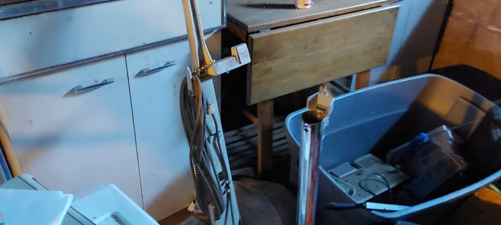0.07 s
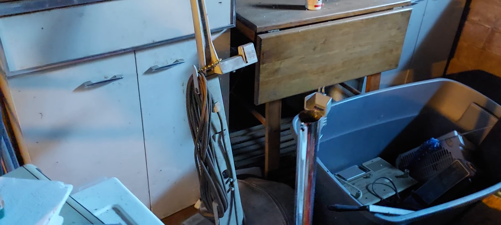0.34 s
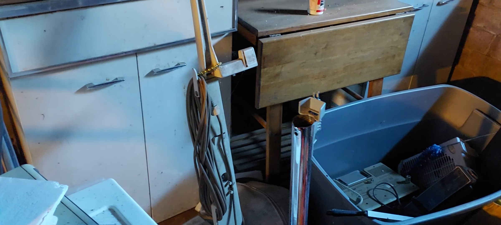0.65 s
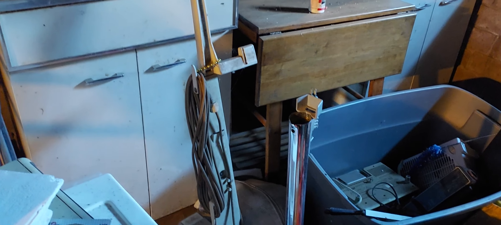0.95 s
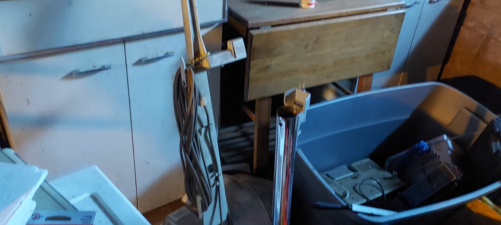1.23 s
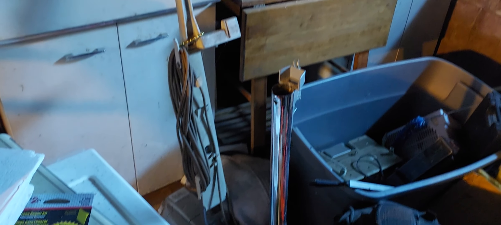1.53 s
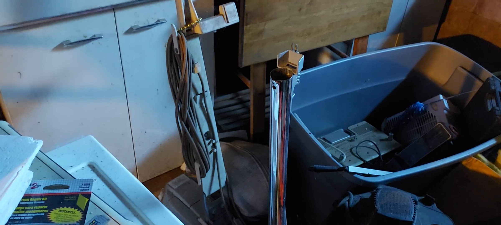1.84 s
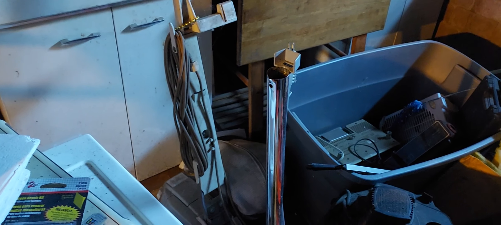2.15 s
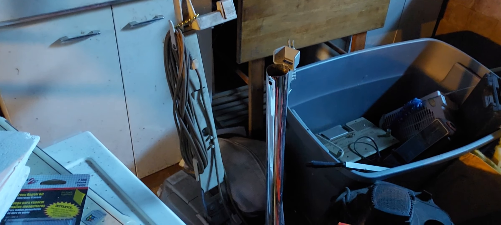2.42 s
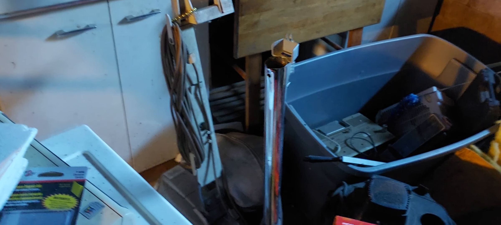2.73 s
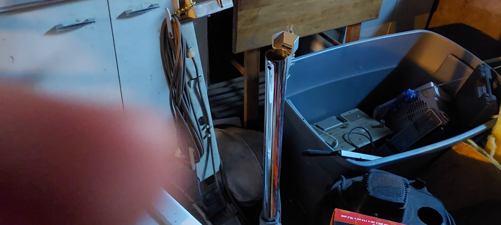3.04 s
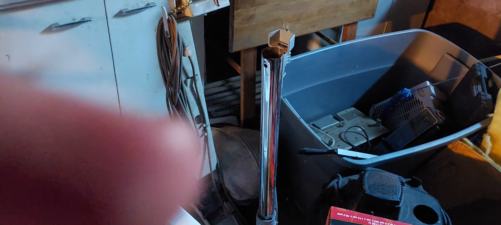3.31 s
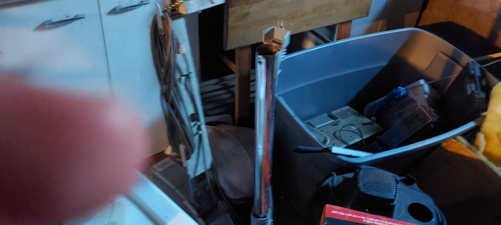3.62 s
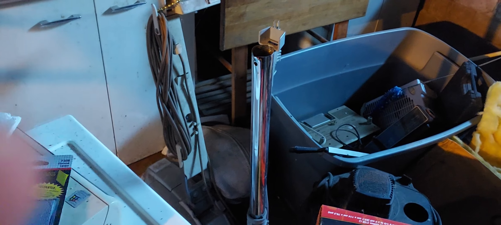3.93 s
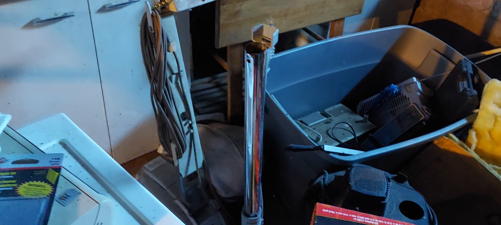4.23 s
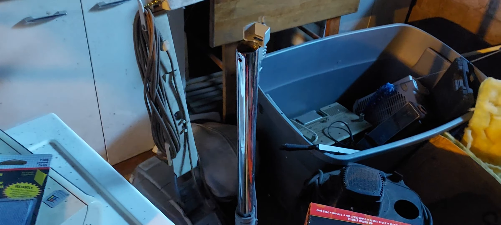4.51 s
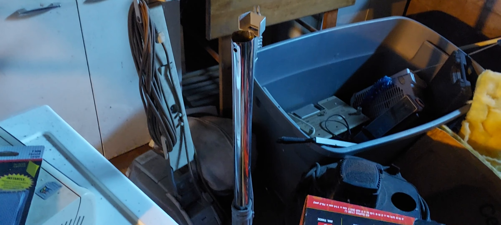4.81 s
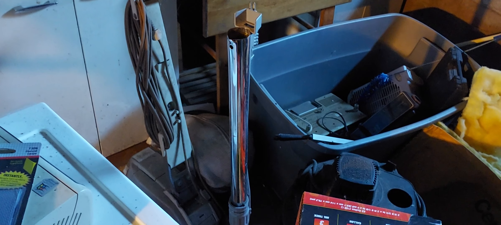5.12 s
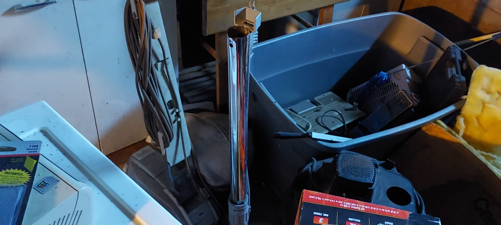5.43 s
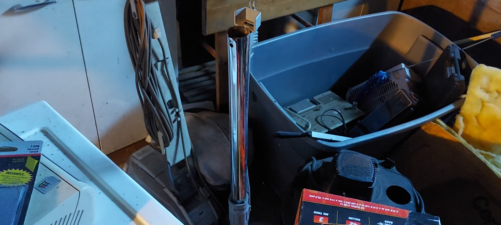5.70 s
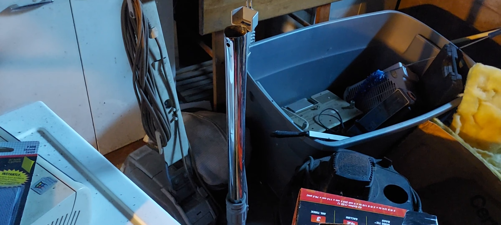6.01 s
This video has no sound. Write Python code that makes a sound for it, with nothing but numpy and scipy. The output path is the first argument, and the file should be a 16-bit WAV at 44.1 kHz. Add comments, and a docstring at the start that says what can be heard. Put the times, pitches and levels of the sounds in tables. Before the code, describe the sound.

A gas furnace runs steadily in a basement: a deep, boomy burner roar under a throbbing blower hum, with a soft rush of air and thin, faint fan whines. It is heard from a hand-held phone. Midway, a finger near the left microphone briefly adds a hollow colour and a faint high ring. Later the grip shifts with a few sharp little ticks and a short slide of skin.

```python
"""The steady low roar of a gas furnace in a basement, heard from a hand-held phone.
Burner noise booms through cabinet, duct and room resonances under a rush of air and thin fan whines;
the blower's shaft tones throb against the motor's mains hum. Close up, the hand brushes the case,
a finger hovers over the left microphone and colours the sound with a hollow ring,
and later the grip shifts with a few ticks and a short slide of skin."""
import sys
import numpy as np
from scipy import signal
from scipy.fft import rfft, irfft, next_fast_len
from scipy.io import wavfile

SR = 44100
rng = np.random.default_rng(int(sys.argv[2]) if len(sys.argv) > 2 else 0)


def bounce(signal):
    """Save signal as a 16-bit WAV file at the path given by the first command-line argument."""
    frames = np.transpose(np.atleast_2d(signal))
    limited = np.clip(frames, -1, 1)
    pcm = np.round(limited * 32767).astype(np.int16)
    wavfile.write(sys.argv[1], SR, pcm)


N = 267201
FFT_SIZE = next_fast_len(N, real=True)
TIME, FREQS = np.arange(N) / SR, np.maximum(np.fft.rfftfreq(FFT_SIZE, 1 / SR), 1)

# the room's stereo image at the microphones: f/Hz, coherence/0-1, left lead/rad, left-right/dB
STEREO_FIELD = [(30, 0.87, 4, -3), (64.3, 0.78, 1.0, -8), (114, 1, 0.39, -4), (178, 0.95, 0.74, -5),
                (229, 0.98, -0.02, 1.5), (356, 1, 0.48, 0.5), (493, 0.94, 1, 0), (805, 0.41, 0, -0.5),
                (1065, 0.03, 1.46, 0), (1370, 0.38, 3.5, -4.5), (2130, 0.09, 3, -5.5),
                (4160, 0.1, 5.5, -1.5), (6350, 0.3, -39, -1)]
# modes of the phone's case: f/Hz, width/Hz, left-right/dB
PHONE_MODES = [(2980, 880, -3), (6200, 1800, -9), (9600, 2600, 5), (14800, 3500, -2)]


def burners(paths):
    """Gas flames: a deep, almost even roar of turbulence."""
    # the roar between the resonances: f/Hz, level/dB per Hz
    roar = [(22, -83), (35, -75), (44, -60.5), (60, -60.5), (79, -64), (92, -56), (115, -54.5),
            (160, -55.5), (195, -62.5), (300, -64.5), (370, -70), (560, -74.5), (850, -78), (1250, -81.5),
            (1450, -99.5), (3000, -125)]
    return turbulence(roar, paths, flutter_db=0.02, flutter_hz=4)


def air_rush(paths):
    """Air flutters through blower and grilles, slowly filling out on the right as the phone turns."""
    # colour of the rush: f/Hz, relative level/dB
    colour = [(700, -110), (1380, -83.5), (1520, -79.5), (1900, -80), (2400, -84.5), (3000, -89.5),
              (4500, -94), (6600, -100.5), (7700, -114), (10000, -130)]
    left, right = turbulence(colour, paths, flutter_db=0.6, flutter_hz=17)
    turn_db_per_s = 0.5
    swell = from_db(turn_db_per_s * (TIME - TIME.mean())) - 1
    right = right + swell * resonate(right, hz=1600, width_hz=800)
    return from_db(-1.68) * np.array([left, right])


def blower(shaft_hz=16.78):
    """The wheel drones at multiples of its shaft rate; the seventh throbs against the motor's hum."""
    # shaft tones: multiple of the shaft rate, rms level/dB, left-right/dB
    orders = [(3, -55.5, -8), (4, -49, -7), (5, -56.5, -5.5), (7, -40, -2), (8, -50, -2.5), (9, -43.5, -9),
              (10, -46, 13), (11, -48, 16), (14, -48.5, -3), (15, -42.5, -3), (18, -50.5, -8),
              (20, -55.5, 1)]
    return tones([(order * shaft_hz, *mix) for order, *mix in orders], wander=0.00038, waver_db=0)


def motor_hum(mains_hz=60):
    """The windings hum at multiples of the mains rate."""
    # hum tones: multiple of the mains rate, rms level/dB, left-right/dB
    orders = [(2, -40.5, 3.5), (8, -55, 1)]
    return tones([(order * mains_hz, *mix) for order, *mix in orders], wander=0.0001, waver_db=1.5)


def fan_whine():
    """The fans add thin, slightly wavering whines."""
    # pitch of each whine: f/Hz
    pitches = [685, 705.9, 905.4, 1412, 2708.8, 4265]
    # mix of each whine: rms level/dB, left-right/dB
    mixes = [(-66, -6), (-60, 9), (-79, 14), (-81, -15), (-90, -3), (-92, -15)]
    return tones([(hz, *mix) for hz, mix in zip(pitches, mixes)], wander=0.00051, waver_db=1.5)


def basement():
    """Ducts and room carry noise to the microphones by two paths: one shared, one to the right only."""
    # cabinet, duct and room resonances: f/Hz, width/Hz, lift/dB, left-right/dB
    resonances = [(64.6, 7.4, 5.5, -6), (111.5, 1.9, 4, -2.5), (139.7, 21.5, 6, 3.5),
                  (234.7, 15.6, 9.5, -4.5), (256.6, 15.7, 11, -1.5), (282, 9.5, 3.5, -15),
                  (306, 8.7, 4.5, -4), (337.6, 14, 5, -13), (384, 20, 2, -2), (445.4, 26, 7, 0.5),
                  (527, 37, 4, -0.5), (566, 34, 4, 3.5), (600, 11, 1, 0), (684, 21, 1.5, -7.5),
                  (755, 64, 6.5, 4), (902, 11.3, 8.5, -1), (942, 31, 7.5, -6), (1061, 20, 7.5, -3.5),
                  (1172, 24, 4.5, 2), (1318, 31, 7, 6), (1723, 66, 4, 1.5)]
    coherence, lead, balance_db = at_hz(STEREO_FIELD)
    lift_db = 0
    for hz, width_hz, mode_db, side_db in resonances:
        bell = 1 / (1 + ((FREQS - hz) / width_hz) ** 2) ** 2
        lift_db = lift_db + mode_db * bell
        balance_db = balance_db + side_db * bell
    left, right = from_db(lift_db) * panned(balance_db)
    # long waves reach both microphones alike
    shared = np.array([left, right * coherence * np.exp(-1j * lead)])
    right_only = np.array([0 * left, right * np.sqrt(1 - coherence ** 2)])
    return shared, right_only


def finger_over_port(sound, gap_width_hz=71, tremble_db=2.2, tremble_hz=30):
    """A hovering finger adds a broad hollow colour and a thin ring to the sound at the port."""
    # ring of the gap, falling as the finger lifts away: t/s, f/Hz, relative level/dB
    gap = [(3.05, 7150, 0), (3.2, 7200, 11), (3.265, 7010, 17), (3.31, 7080, 8), (3.35, 7140, 17),
           (3.43, 7400, 15), (3.53, 7220, 16), (3.61, 7090, 17), (3.7, 7030, 14), (3.745, 6820, 12),
           (3.79, 6750, -30)]
    # hollow under the finger, bright and then deeper: t/s, f/Hz, width/Hz, relative level/dB
    cavity = [(3.05, 1900, 1300, -2), (3.32, 2700, 2800, -4), (3.5, 2150, 1300, -8), (4.0, 1950, 1200, -4)]
    gap_hz, gap_db = in_time(gap)
    # a narrow band of the sound follows the gap's pitch
    carrier = np.exp(2j * np.pi * np.cumsum(gap_hz + tremble_hz * drift(5)) / SR)
    pole = np.exp(-np.pi * gap_width_hz / SR)
    ring = 2 * np.real(carrier * signal.lfilter([1 - pole], [1, -pole], sound / carrier))
    hollow_hz, hollow_width_hz, hollow_db = in_time(cavity)
    hollow = from_db(hollow_db) * gliding(sound, hollow_hz, hollow_width_hz)
    rub = rim_rub()
    ring *= from_db(gap_db + tremble_db * drift(11))   # breaks up as the finger trembles
    closeness = gesture(start_s=2.97, attack_s=0.19, hold_s=0.68, release_s=0.42)
    return closeness * (hollow + ring) + rub


def rim_rub(at_s=3.32, spread_s=0.05):
    """The fingertip rubs the rim of the port once: a narrow puff of friction."""
    envelope = from_db(-88.5) * np.exp(-((TIME - at_s) / spread_s) ** 2)
    return envelope * resonate(to_time(white()[0]), hz=4300, width_hz=320)


def case_ticks(left_lag_s=0.000028, echo_s=0.0047):
    """The case snaps under the grip, each snap striking every mode with a strength of its own."""
    # snaps: t/s, left-right/dB, then level/dB in each of the four case modes
    snaps = [(4.8754, -4, -66, -62, -56, -32.5), (4.9034, -3, -58, -53, -40, -19),
             (5.0158, 0, -29.5, -62, -46, -48), (5.0474, 10, -45, -37.5, -31, -28.5),
             (5.0636, 11, -56, -45, -41, -40), (5.0654, 3, -58, -45, -47, -48)]
    out = np.zeros((2, N))
    for mode, (hz, width_hz, side_db) in enumerate(PHONE_MODES):
        pip = case_ring(signal.unit_impulse(1024), hz, width_hz)
        pip /= np.abs(pip).max()
        for at_s, balance_db, *mode_db in snaps:
            at = round(at_s * SR)
            out[:, at:at + len(pip)] += from_db(mode_db[mode]) * panned(balance_db + side_db) * pip
    left, right = rfft(out, FFT_SIZE)
    direct = np.array([left * delay(left_lag_s), right])
    # a near surface throws each snap back, mostly to the right port
    echo = from_db(-18) * panned(-8) * delay(echo_s)
    return to_time(direct * (1 + echo))


def skin_slide(at_s=5.042, press_s=0.06, ease_s=0.16, ease_db=16, grain_db=1.5):
    """One grainy slide along the case: skin grips, presses, eases to a light touch and lets go."""
    # colour of the friction: f/Hz, relative left level/dB, relative right level/dB
    friction = [(600, -96, -94), (1300, -79, -76), (2580, -82, -81), (4200, -95, -88), (5500, -99, -89),
                (6600, -90, -92), (7500, -94, -113), (9400, -90.5, -106), (10600, -91.5, -103.5),
                (12700, -84.5, -100), (14200, -87, -95), (15700, -89, -96), (16200, -120, -122)]
    contact = gesture(at_s, attack_s=0.015, hold_s=0.31, release_s=0.06)
    eased = 1 - np.exp(-np.maximum(TIME - at_s - press_s, 0) / ease_s)
    pressure_db = -1 - ease_db * eased
    return contact * from_db(pressure_db + grain_db * drift(120)) * coloured_noise(friction)


def hand_brushes(rise_share=0.25):
    """Light, airy brushes of the hand, a little nearer the right port, and the rasp that follows the snap at
    4.9 s; each swells fast and fades."""
    # strokes: peak t/s, relative level/dB, decay/s
    strokes = [(0.121, -1, .11), (.46, 0, .06), (.94, -1, .035), (1.58, -7, .15), (2.34, -6, .06),
               (2.72, -1, .06), (2.9, -1, 0.4), (4.78, 0, 0.19), (4.908, 10, 0.029), (5.77, 2, .039),
               (5.976, 5, .022)]
    # colour of a brush: f/Hz, relative level/dB
    colour = [(5000, -128), (9000, -112.5), (11000, -111.5), (13000, -104.5), (14500, -101.5),
              (15700, -102.5), (16200, -128)]
    touch = 0
    for peak_s, level_db, decay_s in strokes:
        falloff = np.maximum((peak_s - TIME) / rise_share, TIME - peak_s) / decay_s
        touch = touch + from_db(level_db) * np.exp(-np.minimum(falloff, 20))
    return touch * panned(-1) * coloured_noise(colour)


def palm_settling(decay_s=0.18):
    """Soft friction of the palm at the start rings the lowest mode of the case and dies away."""
    hz, width_hz, side_db = PHONE_MODES[0]
    envelope = from_db(-83.5) * np.exp(-TIME / decay_s)
    return envelope * panned(side_db) * case_ring(to_time(white()), hz, width_hz)


def microphone_hiss():
    """The microphones' own faint, bright noise floor."""
    # hiss: f/Hz, left level/dB per Hz, right level/dB per Hz
    floor = [(5000, -116, -120), (8100, -112.3, -116), (9250, -110, -114.3), (10900, -109.8, -112.3),
             (12400, -111.5, -111), (14000, -112, -107.5), (15700, -111.5, -109.5), (16100, -135, -135)]
    return coloured_noise(floor)


def turbulence(spectrum, paths, flutter_db, flutter_hz):
    """Noise of a flow whose strength flutters, filling the basement."""
    shared, right_only = white()
    sound = to_time(from_db(at_hz(spectrum)) * (paths[0] * shared + paths[1] * right_only))
    return sound * from_db(flutter_db * drift(flutter_hz))


def tones(rows, wander, waver_db):
    """Tones locked to one wandering speed; waver_db is the hand's drift through standing waves."""
    clock = np.cumsum(1 + wander * drift(1.0)) / SR
    out = 0
    for hz, level_db, balance_db in rows:
        lead = at_hz(STEREO_FIELD, hz)[1]
        phase = 2 * np.pi * (hz * clock + rng.random())
        level = np.sqrt(2) * from_db(level_db + waver_db * drift(0.35))
        out = out + level * panned(balance_db) * np.sin([phase, phase - lead])
    return out


def gesture(start_s, attack_s, hold_s, release_s):
    """Envelope of a hand movement, from 0 to 1 and back."""
    return np.interp(TIME, start_s + np.cumsum([0, attack_s, hold_s, release_s]), [0, 1, 1, 0])


def case_ring(x, hz, width_hz):
    """A heavily damped mode of the case; steep skirts round a snap into a pip."""
    return resonate(resonate(resonate(x, hz, width_hz), hz, width_hz), hz, width_hz)


def resonate(x, hz, width_hz):
    """A fixed resonance."""
    return signal.lfilter(*two_pole(hz, width_hz), x + 1e-18)


def gliding(x, hz, width_hz, block=128):
    """A resonance whose centre and width move, stepped in short blocks."""
    out, state = np.zeros(N), np.zeros(2)
    change = x - np.pad(x, (2, 0))[:N]
    for i in range(0, N, block):
        b, a = two_pole(hz[i], width_hz[i])
        out[i:i + block], state = signal.lfilter(b[:1], a, change[i:i + block], zi=state)
    return out


def two_pole(hz, width_hz):
    """Coefficients of a resonance with gain 1 at its peak."""
    r = np.exp(-np.pi * width_hz / SR)
    return np.array([1, 0, -1]) * (1 - r * r) / 2, [1, -2 * r * np.cos(2 * np.pi * hz / SR), r * r]


def drift(rate_hz, control_hz=500):
    """Smooth random modulation with spread 1."""
    r = np.exp(-2 * np.pi * rate_hz / control_hz)
    slow = signal.lfilter([1], [1, -2 * r, r * r], rng.standard_normal(6000))[2000:]
    return np.interp(TIME * control_hz, np.arange(len(slow)), slow / slow.std())


def white():
    """Spectra of two unrelated noises at 0 dB per Hz."""
    return rfft(rng.standard_normal((2, FFT_SIZE))) * np.sqrt(SR / 2)


def coloured_noise(spectrum):
    """Wide stereo noise shaped by a spectrum."""
    return to_time(white() * from_db(at_hz(spectrum)))


def delay(seconds):
    """A delay, as a factor on a spectrum."""
    return np.exp(-2j * np.pi * FREQS * seconds)


def to_time(spectra):
    """Spectra back to sound."""
    return irfft(spectra, FFT_SIZE)[..., :N]


def in_time(rows):
    """The columns of a curve at every sample."""
    times, *columns = np.transpose(rows)
    return [np.interp(TIME, times, c) for c in columns]


def at_hz(rows, hz=FREQS):
    """The columns of a spectrum, joined on a log-frequency axis."""
    points, *columns = np.transpose(rows)
    return np.array([np.interp(np.log(hz), np.log(points), c) for c in columns])


def panned(balance_db):
    """Left and right gains for a level difference, at constant power."""
    gains = from_db(np.array([[.5], [-.5]]) * balance_db)
    return gains / np.sqrt(np.mean(gains ** 2, axis=0))


def from_db(db):
    """Decibels to gain."""
    return 10 ** (np.asarray(db) / 20)


def scene():
    """The furnace fills the basement; the hand on the phone adds small sounds up close."""
    paths = basement()
    furnace = burners(paths) + air_rush(paths) + blower() + motor_hum() + fan_whine()
    furnace[0] += finger_over_port(furnace[0])   # left microphone only
    return furnace + case_ticks() + palm_settling() + skin_slide() + hand_brushes()


def record(dry):
    """The microphones add their hiss and the top is cut steeply."""
    high_cut = signal.ellip(10, .1, 50, 16500, fs=SR, output="sos")
    return signal.sosfiltfilt(high_cut, dry + microphone_hiss())


dry = scene()
out = record(dry)
bounce(out)
```